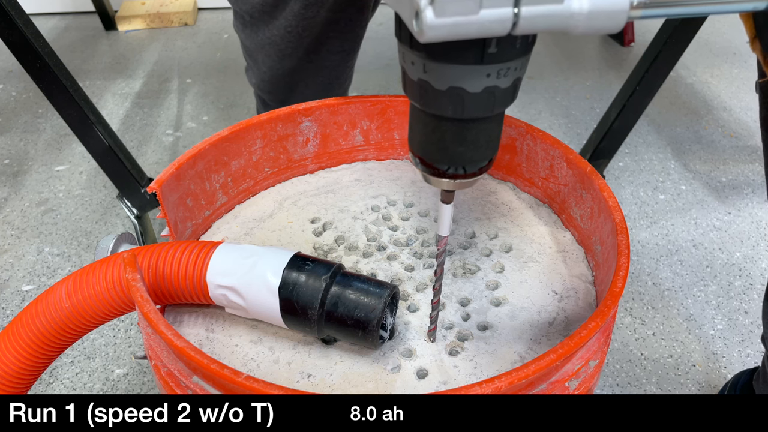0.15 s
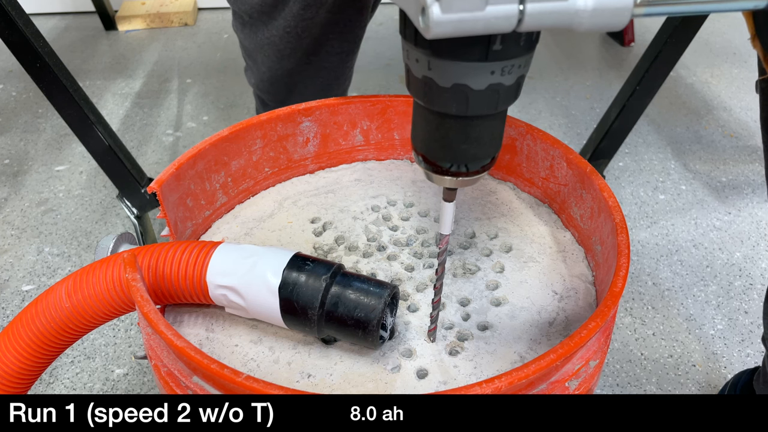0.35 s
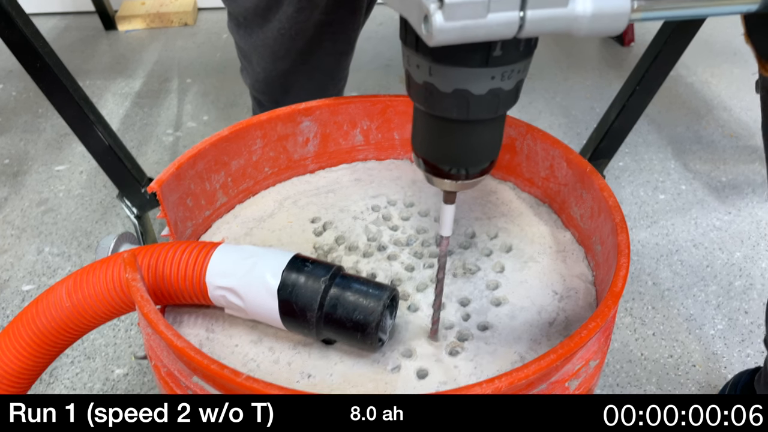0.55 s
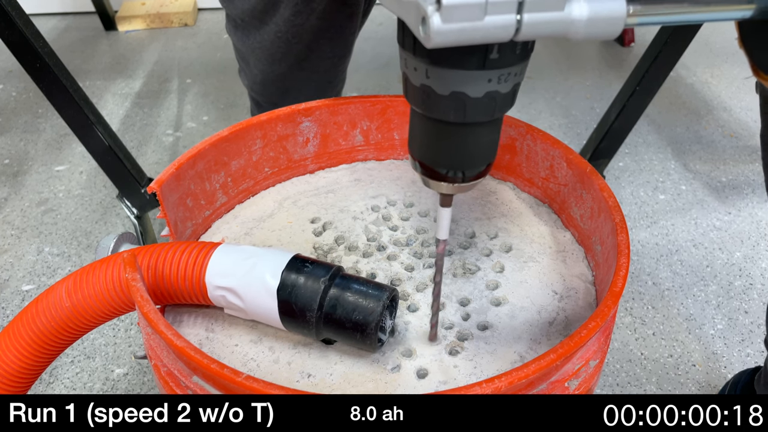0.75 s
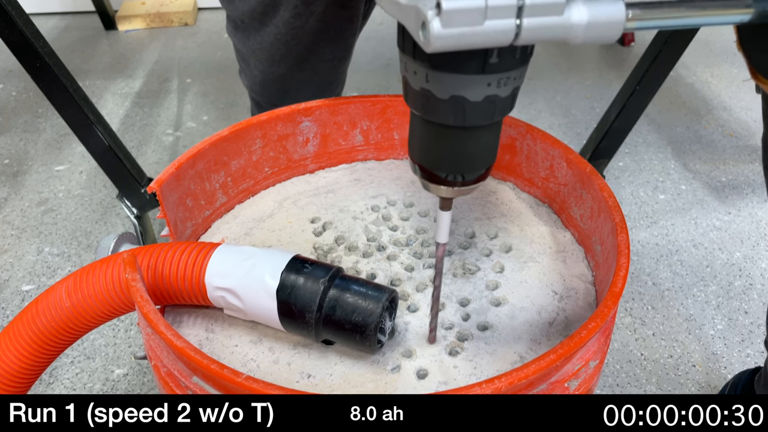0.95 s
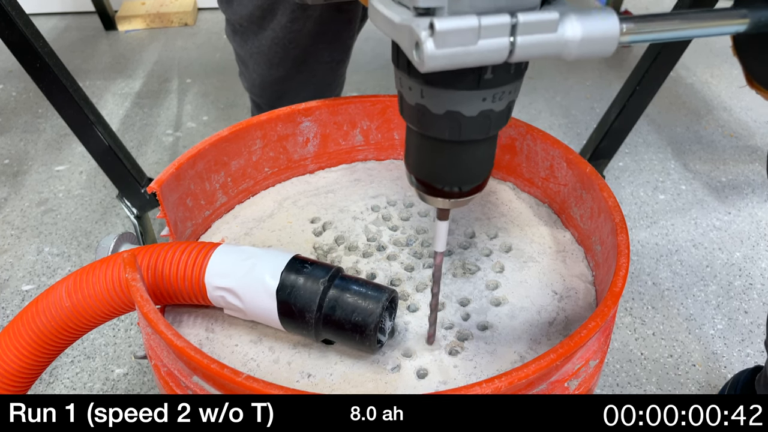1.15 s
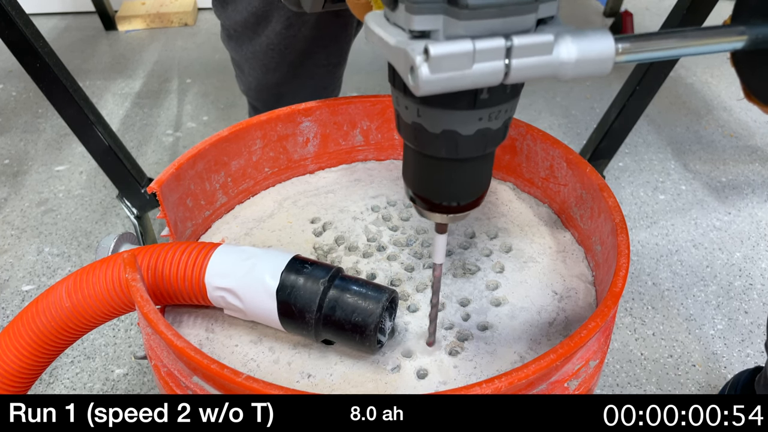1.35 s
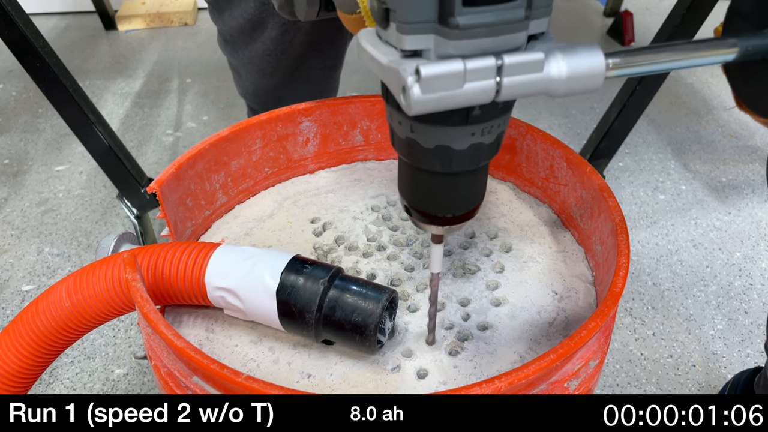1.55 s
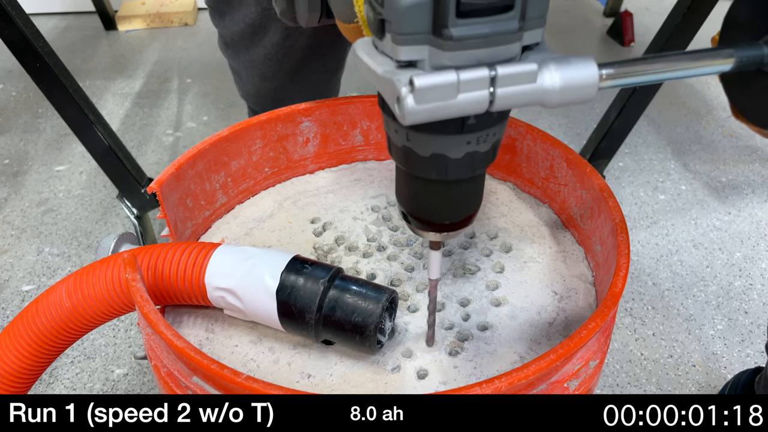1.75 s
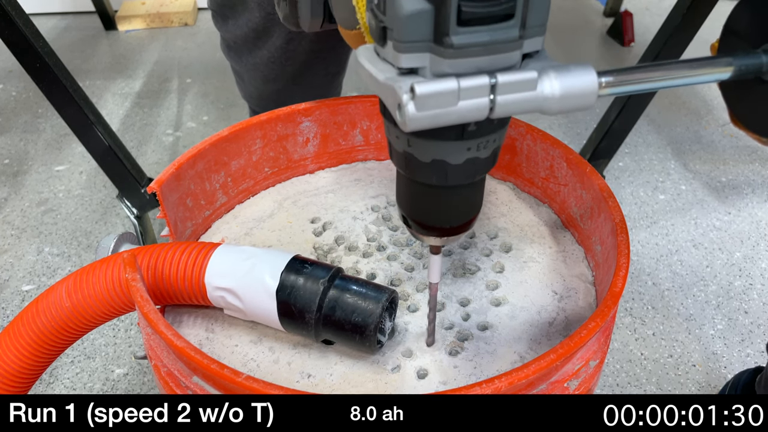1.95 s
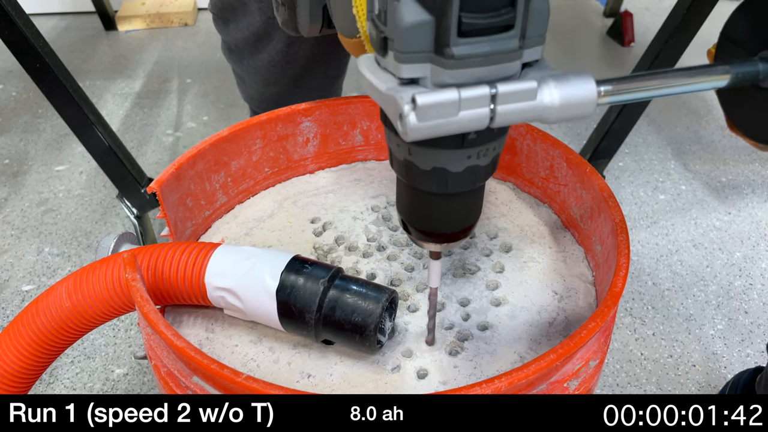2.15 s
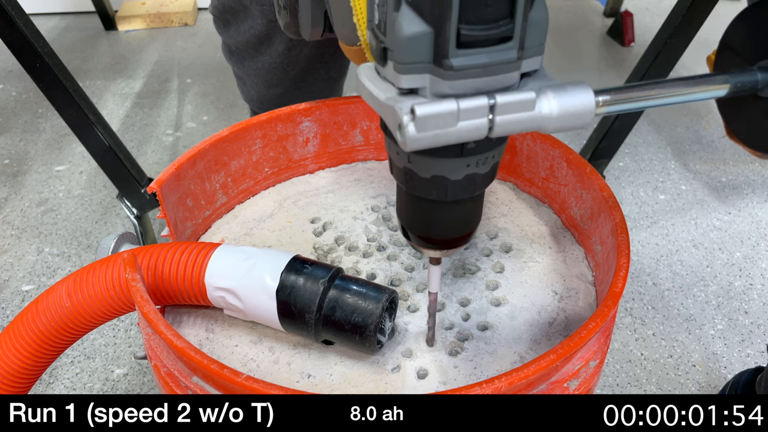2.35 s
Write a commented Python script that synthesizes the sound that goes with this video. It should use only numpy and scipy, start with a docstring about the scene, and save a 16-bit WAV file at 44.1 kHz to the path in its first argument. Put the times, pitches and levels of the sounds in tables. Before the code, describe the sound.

Hammer drill buzzing and grinding into concrete, following a moment of vacuum hiss.

```python
"""A dust vacuum whines and hisses close to a mid/side microphone pair, beside a concrete block.
A trigger rattles, then a hammer drill starts up and bores into the block. A ratchet of sixteen teeth
strikes the bit; the blows speed up from single knocks to a steady tone, which sags under load and
throbs once a turn, over the hiss of crushed concrete. The vacuum sinks far back once the drill is on."""
import sys
import numpy as np
from scipy import signal
from scipy.fft import rfft, irfft
from scipy.io import wavfile
from scipy.ndimage import uniform_filter1d

SR = 44100
rng = np.random.default_rng(int(sys.argv[2]) if len(sys.argv) > 2 else 0)


def unload_wav(signal):
    """Save mono or channel-first audio to the path in sys.argv[1] as 16-bit WAV at rate SR, clipped to [-1, 1]."""
    wavfile.write(
        sys.argv[1],
        SR,
        np.round(np.clip(np.atleast_2d(signal).T, -1, 1) * 32767).astype(np.int16),
    )


N = 110250
TIME = np.arange(N) / SR
TEETH = 16  # blows per shaft turn
MID_S = 1.16  # level drift and throb growth pivot on this moment

# How fast the ratchet strikes: (time [s], blow rate [Hz])
BLOW_RATE = [(.4385, 0), (.46, 105), (.48, 205), (.53, 410), (.55, 465), (.57, 482), (.65, 479.2),
             (.85, 480), (1., 478.2), (1.15, 476.8), (1.3, 474), (1.45, 470.5), (1.6, 467.1), (1.7, 468.4),
             (1.8, 462.1), (1.9, 466.2), (2.05, 464.8), (2.2, 464), (2.5, 462.6)]
# Base levels of the drill's layers: (time [s], fundamental [dB], fifth multiple [dB],
# other multiples [dB], uneven blows [dB], grinding hiss [dB], rumble [dB])
DRILL_LEVELS = [(.43, -82, -82, -84, -51.5, -46, -56), (.445, -72, -69, -59, -25, -32, -52),
                (.46, -80, -80, -70, -33.5, -33.5, -51), (.48, -66, -61, -47.5, -31, -40.5, -38),
                (.52, -46.5, -51, -61.5, -29.5, -40.5, -46), (.55, -50.5, -38.5, -45, -39, -40, -56),
                (.57, -45, -39.5, -52, -48, -40.5, -57.5), (.655, -44, -41.5, -51.5, -42, -39.5, -63),
                (.67, -48, -42, -57.5, -51, -43, -68), (.78, -48.5, -44, -57, -45, -44, -61),
                (.87, -49.5, -49, -60.5, -41.5, -44, -58.5), (1., -48.5, -43.5, -60, -42.5, -45, -62.5),
                (1.07, -49, -44, -59, -45, -44.5, -63), (1.15, -50.5, -44, -59, -45.5, -46.5, -64.5),
                (1.27, -51, -43, -59.5, -54.5, -45.5, -64), (1.45, -52, -41, -57, -64, -47, -67),
                (1.7, -50, -43.5, -56, -62, -46.5, -72), (1.8, -52, -47, -55, -50, -48, -70),
                (1.95, -50, -44.5, -59, -48, -48.5, -98), (2.05, -51, -45, -57.5, -50.5, -48.5, -96),
                (2.2, -52.5, -45, -58, -57, -49.5, -106), (2.35, -52.5, -46.5, -57.5, -50, -50, -84),
                (2.5, -52.5, -49, -58, -55, -49, -78)]


def gain_of(db):
    """Decibels as an amplitude factor."""
    return 10 ** (np.asarray(db) / 20)


def unit_rms(x):
    """The signal scaled to an rms of one."""
    return x / np.sqrt(np.mean(x ** 2) + 1e-20)


def curve(table, column=1):
    """One column of a timed table at every sample; the end values are held."""
    rows = np.array(table)
    return np.interp(TIME, rows[:, 0], rows[:, column])


def during(start, end, edge_s=0.021):
    """One between two moments, with soft edges."""
    return np.clip(np.minimum(TIME - start, end - TIME) / edge_s + .5, 0, 1)


def wander(top_hz):
    """Random wavering of unit rms, no faster than top_hz."""
    t = TIME[::64]
    rates = np.geomspace(top_hz / 12, top_hz, num=16)
    waves = sum(np.sin(2 * np.pi * (hz * t + rng.random())) / np.sqrt(hz) for hz in rates)
    return np.interp(TIME, t, unit_rms(waves))


def bin_gains(spectrum):
    """Gain for every frequency bin from a spectrum table."""
    hz, db = np.transpose(spectrum)
    return gain_of(np.interp(np.log(np.fft.rfftfreq(N, 1 / SR) + 1), np.log(hz), db))


def mid_side_noise(mid_spectrum, side_spectrum, share=0.29):
    """Coloured noise; a share of the side is the mid, a quarter cycle ahead."""
    mid, unrelated = rfft(rng.standard_normal((2, N)))
    side = 1j * share * mid + np.sqrt(1 - share ** 2) * unrelated
    return irfft(np.array([mid * bin_gains(mid_spectrum), side * bin_gains(side_spectrum)]), N)


def ring(x, hz, width_hz):
    """A resonance with a gain of about one at its peak."""
    radius = np.exp(-np.pi * width_hz / SR)
    pole = radius * np.exp(2j * np.pi * hz / SR)
    return 2 * signal.lfilter([1 - radius], [1, -pole], x).real


def vacuum(sink_at_s=.452, sink_takes_s=.03, sink_db=-25.5):
    """Motor tones over rushing air beside the block; all of it sinks when the drill starts."""
    # Motor tones: (frequency [Hz], rms level before sinking [dB])
    motor_tones = [(129.2, -61), (376.8, -45), (753.7, -54.5), (969.0, -61), (1507, -61.5), (2229, -62.5),
                   (2638, -61), (3187, -67.5), (3332, -62), (4145, -66.5), (6616, -75), (8166, -64),
                   (8285, -72), (9620, -89)]
    # Air rush at the mid and at the side microphone: (frequency [Hz], relative density [dB])
    air_mid = [(30, -30), (60, -4), (127, -7.5), (220, -0.5), (330, -8), (500, -3.5), (645, -12.5),
               (955, 0), (1200, -7), (1500, -3.5), (2210, -11), (2460, -43), (2660, -5.5), (5830, -27.5),
               (8420, -16), (12500, -79), (13500, -54), (15800, -64)]
    air_side = [(18, -60), (30, -41), (372, -18), (471, -23), (755, -12.5), (2150, -18.5), (2460, -21.5),
                (3450, -13.5), (5250, -58), (10100, -34), (11500, -62), (12800, -71), (15800, -60)]
    air = mid_side_noise(air_mid, air_side)
    out = gain_of([[-46], [-47]]) * air / air.std(axis=1, keepdims=True)
    for hz, db in motor_tones:
        phase = 2 * np.pi * (hz * TIME + rng.random())
        waver_db = 2.2 * wander(24.3) * (hz > 500)
        size = np.sqrt(2) * gain_of(db + waver_db)
        out += size * np.array([np.cos(phase), gain_of(-24) * np.sin(phase)])
    return out * gain_of(sink_db * np.clip((TIME - sink_at_s) / sink_takes_s, 0, 1))


def grinding(blows, throb, floor=.6, puff_decay_s=.005):
    """A hiss, there from the outset; each blow crushes concrete and adds a puff. Puffs merge at speed."""
    # Grinding hiss at the mid and at the side microphone: (frequency [Hz], relative density [dB])
    hiss_mid = [(40, -32), (300, -13.5), (600, -20), (950, -4.5), (1600, -2.5), (2100, 0.5), (2330, 9.5),
                (2600, 3.5), (2900, 2), (3150, -7.5), (3350, 0.5), (3550, -3), (3800, 1), (4300, -2.5),
                (5400, 1.7), (5950, -4), (6600, 1.5), (7400, -5.5), (7900, -18), (8500, -6.5),
                (10000, -2.5), (13000, -8.5), (13700, -24), (15800, -34)]
    hiss_side = [(40, -20), (300, -19), (600, -15.5), (1200, -8.5), (2400, 4), (3500, -3), (5000, 5.5),
                 (6200, -3.5), (8900, -2.5), (10000, -9), (10600, -49), (12300, -36), (12800, -7.5),
                 (15800, -6)]
    hiss = mid_side_noise(hiss_mid, hiss_side)
    struck = np.diff(np.floor(blows - 1e-9), prepend=-1) > 0
    since_blow = TIME - np.maximum.accumulate(TIME * struck)
    puffs = (floor + np.exp(-since_blow / puff_decay_s)) * (1 + 0.0092 * throb)
    level_db = curve(DRILL_LEVELS, column=5) + 0.32 * wander(28.96)
    return gain_of(level_db) * puffs * hiss / np.std(hiss[0])


def trigger(hz=3050, width_hz=700, t60=.03):
    """The trigger rattles: short bursts of noise ring a plastic shell."""
    # Rattles: (time [s], level going into the shell [dB])
    rattles = [(.414, -22), (.4185, -20), (.428, -28)]
    envelope = sum(gain_of(db - 60 * np.maximum(TIME - s, 0) / t60) * (TIME > s) for s, db in rattles)
    bursts = envelope * rng.standard_normal(N)
    return ring(ring(bursts, hz, width_hz), hz, width_hz)


def rumble():
    """Low lumpy shaking of block and bucket once the drill is on."""
    # Spectrum of the shaking: (frequency [Hz], relative density [dB])
    spectrum = [(15, -43), (25, -20), (54, 7), (118, 9), (178, 10), (226, 1), (330, -1), (430, 7),
                (730, -120)]
    shaking = unit_rms(irfft(rfft(rng.standard_normal(N)) * bin_gains(spectrum), N))
    level_db = curve(DRILL_LEVELS, column=6) + 2.9 * wander(19.9)
    return gain_of(level_db) * shaking * (TIME > DRILL_LEVELS[0][0])


def body_ring(samples=2048, rise_s=.001):
    """Bit, chuck and housing ring after one blow, in mid and side."""
    # Resonances: (frequency [Hz], width [Hz], relative mid level [dB], relative side level [dB])
    modes = [(490, 58, -16, -28), (990, 730, -11.5, -49), (1320, 150, -11, -17), (1820, 83, -7, -15),
             (2204, 340, -5, -22), (2476, 332, 9.5, -15), (2536, 154, 3.5, -9), (3040, 370, -39, -4),
             (4160, 240, -10.5, -13), (4810, 300, -8.5, -23), (5460, 280, -10.5, -9), (6700, 280, -27, -5),
             (9500, 160, -15, -20)]
    blow = np.arange(samples) == 0
    out = np.zeros((2, samples))
    for k, (hz, width, mid_db, side_db) in enumerate(modes):
        mode = ring(ring(blow, hz, width), hz, 3 * width) / np.sqrt(width)
        quarter_late = np.roll(mode, round(SR / hz / 4))
        out += np.array([(-1) ** k * gain_of(mid_db) * mode, gain_of(side_db) * quarter_late])
    out *= np.minimum(TIME[:samples] / rise_s, 1)
    return out / np.abs(out[0]).max()


def hammering(blows, throb, spread_db=3.5, likeness=.8):
    """Each blow departs from the average, much as the one half a turn before did, and rings the body."""
    # The first blows, still heard one by one: (time [s], peak level [dB])
    first_blows = [(0.438, -20.5), (0.4581, -20.5), (0.4664, -21), (0.4737, -24.5), (0.4782, -19),
                   (0.482, -27), (0.4889, -24), (.4928, -25), (.4966, -21), (.5001, -24), (.5042, -23),
                   (0.508, -21), (0.5124, -24), (0.5138, -27), (0.5166, -25.5), (.5196, -24)]
    ringing = body_ring()
    half_turn = TEETH // 2
    struck = (np.diff(np.floor(blows), prepend=0) > 0) & (TIME > first_blows[-1][0] + .002)
    chance = rng.choice([-1., 1.], 2000) * gain_of(spread_db * rng.standard_normal(2000))
    departure = signal.lfilter([1], np.r_[1, np.zeros(half_turn - 1), -likeness], chance)
    departure -= uniform_filter1d(departure, half_turn)
    departure /= np.sqrt(uniform_filter1d(departure ** 2, half_turn))
    # faster blows are each weaker, so the rate does not change the power
    rate_gain = np.sqrt(SR / np.maximum(curve(BLOW_RATE), 1)) / np.linalg.norm(ringing[0])
    strength = rate_gain * gain_of(curve(DRILL_LEVELS, column=4)) * (1 + 0.063 * throb)
    hits = struck * departure[blows.astype(int)] * strength
    for s, peak_db in first_blows:
        hits[round(s * SR)] = gain_of(peak_db)
    return signal.oaconvolve(hits[None], ringing, axes=1)[:, :N]


def bucket_thumps(hz=133.6, t60=0.097, rise_s=0.0015):
    """The first blows thump the bucket, each a low dying tone."""
    # Thumps: (time [s], level [dB])
    thumps = [(.443, -29.5), (.468, -28.5), (.505, -34)]
    out = np.zeros(N)
    for s, db in thumps:
        age = np.maximum(TIME - s, 0)
        envelope = gain_of(db - 60 * age / t60) * np.minimum(age / rise_s, 1)
        out += envelope * np.sin(2 * np.pi * hz * age)
    return out


def ratchet_tone(blows, throb, settled_s=1.3, settle_takes_s=0.29):
    """The even part of the blows: multiples of the blow rate, the highest rising as the bit settles."""
    # Partials, one of them a shaft rate above the seventh: (multiple of the blow rate [-])
    multiples = [1, 2, 3, 4, 5, 6, 7, 7 + 1 / TEETH, 8, 9, 10, 11, 12]
    # For each partial: (mid offset [dB], drift [dB/s], side offset [dB], side lead [rad], throb [-])
    voicing = [(0.6, -0.35, -9.5, 1.9, 0.08), (1, -2, -9.5, 1.6, 0), (2, 1, -2.5, -2, 0),
               (2, -1, 2.5, 0.96, 0.49), (1.4, 0.06, -5, 1.7, 0.2), (-10, 0, -7, 1.8, 0.2),
               (-10, 0, 0, 0, 0.03), (-3, 1, 1.5, 1, 0.18), (-11, 0, -13, 4.5, 0), (-14, 0, -13, 3, 0),
               (-9, 0, -2, 4, 0), (-4, -3, 0, 2.5, 0), (-12, 0, -7, 1.1, .1)]
    # A partial comes forward or falls back: (start [s], end [s], multiple [-], mid [dB], side [dB])
    swells = [(0.925, 1.25, 2, -24, 2), (1.77, 2.6, 2, -9, 0), (0.92, 1.13, 3, -20, 4),
              (1.86, 2.04, 3, -18, 0), (0.595, 1.32, 4, 5.5, -6), (0.54, 0.61, 6, 13.5, -4),
              (2.045, 2.6, 6, 15.5, 14), (2.2, 2.6, 4, 3.5, 6.5), (.5, 0.76, 7, 5, -8),
              (1.23, 1.48, 7, 12.5, 2), (2.3, 2.6, 7, 9, -1), (1.5, 1.85, 8, 11.5, 5),
              (2.08, 2.27, 8, 11, -4), (1.36, 1.72, 9, 12, 4), (0.72, 1.52, 12, 12.5, 1),
              (2.08, 2.25, 12, 9, 8)]
    # The two cutting edges push the blows early and late, a warble twice a turn: (time [s], level [dB])
    warble_levels = [(.55, -61), (.7, -65), (.8, -64), (.95, -65), (1.03, -61.5), (1.22, -58.5),
                     (1.29, -85), (1.78, -82), (1.85, -62.5), (2.03, -67.5), (2.1, -81), (2.5, -70)]
    # The partials that warble: (multiple [-]: offset [dB])
    warble_offsets = {2: -2, 3: -1, 4: 2, 5: 11, 7: -4}
    blows = blows + 0.0036 * wander(33)  # slight flutter
    unsettled_db = -np.clip((settled_s - TIME) / settle_takes_s, 0, 1)
    warble = 2 * np.sqrt(2) * gain_of(curve(warble_levels)) * (TIME > warble_levels[0][0])
    warble *= np.cos(2 * np.pi * 2 * blows / TEETH)
    out = np.zeros((2, N))
    for k, (mid_db, drift, side_db, lead, depth) in zip(multiples, voicing):
        level_db = curve(DRILL_LEVELS, column={1: 1, 5: 2}.get(k, 3)) + drift * (TIME - MID_S)
        level_db += 1.3 * np.tanh(wander(12)) * (k not in (1, 5))  # the weaker partials waver
        level_db += unsettled_db * (k > 6)
        for start, end, multiple, more_mid_db, more_side_db in swells:
            if multiple == k:
                mid_db += more_mid_db * during(start, end)
                side_db += more_side_db * during(start, end)
        phase = 2 * np.pi * (k * blows + rng.random())
        size = np.sqrt(2) * gain_of(level_db) * (1 + depth * throb)
        out += size * np.array([gain_of(mid_db) * np.cos(phase), gain_of(side_db) * np.cos(phase + lead)])
        if k in warble_offsets:
            quadrature = np.array([np.sin(phase), gain_of(-8) * np.sin(phase + lead)])
            out += warble * gain_of(warble_offsets[k]) * quadrature
    return out


def scrape(hz=5400, width_hz=470, level_db=-47.5):
    """The bit scrapes in a gritty band until it has bitten in."""
    grit = rng.standard_normal(N) * gain_of(1.9 * wander(90.3))
    band = ring(ring(grit, hz, width_hz), hz, width_hz)
    return gain_of(level_db) * during(start=0.51, end=.81) * unit_rms(band)


def scene():
    """Drill and vacuum at the mid/side pair, turned into left and right."""
    blows = np.cumsum(curve(BLOW_RATE)) / SR  # running count
    throb = np.cos(2 * np.pi * blows / TEETH + .74)  # once a shaft turn
    throb *= 1 + 0.54 * (TIME - MID_S)  # deepens as the drilling goes on
    mid, side = ratchet_tone(blows, throb) + hammering(blows, throb) + grinding(blows, throb) + vacuum()
    low = rumble() + bucket_thumps()
    rattle = trigger()
    mid += low + rattle + scrape()
    side += np.roll(rattle, 4) - 0.12 * low
    return np.array([mid + side, mid - side])


def record(dry):
    """The microphone chain cuts off the highest treble."""
    lowpass = signal.firwin(511, cutoff=15900, window=("kaiser", 9), fs=SR)
    return signal.oaconvolve(dry, lowpass[None], "same")


dry = scene()
out = record(dry)
unload_wav(out)
```